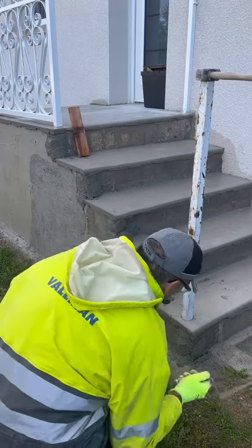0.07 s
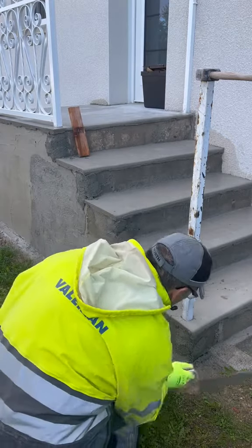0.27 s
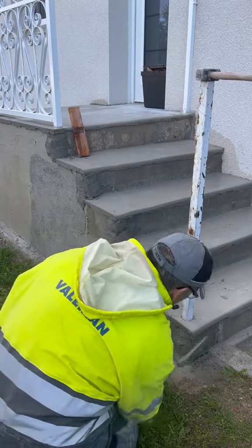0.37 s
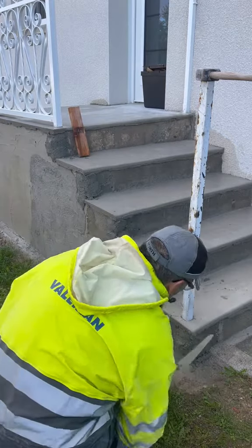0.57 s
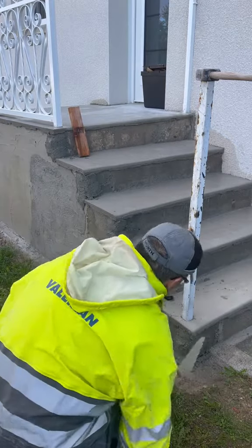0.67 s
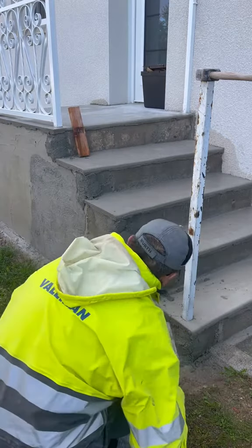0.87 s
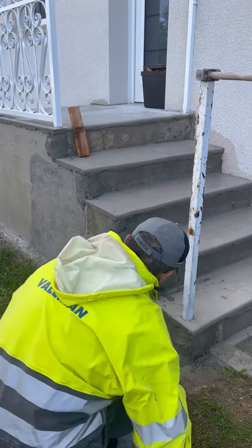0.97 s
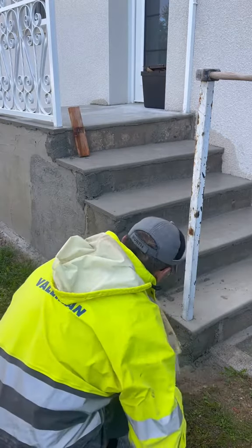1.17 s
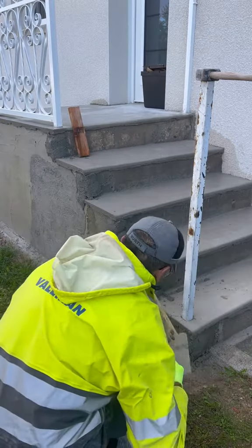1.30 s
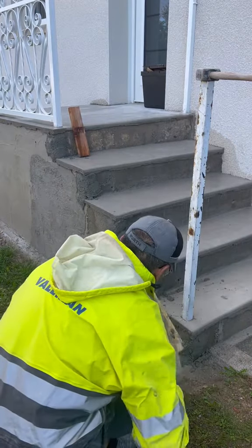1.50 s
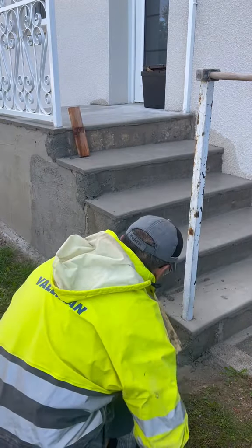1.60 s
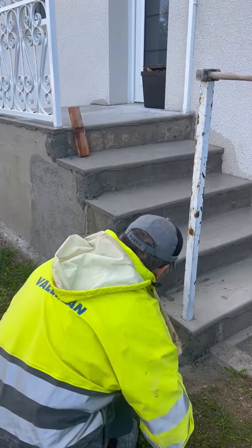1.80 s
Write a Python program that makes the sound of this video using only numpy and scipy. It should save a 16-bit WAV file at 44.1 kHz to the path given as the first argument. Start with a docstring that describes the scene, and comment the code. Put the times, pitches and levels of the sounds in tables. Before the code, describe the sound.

A trowel works wet mortar nearby: one sharp, sandy tap, a pause, then a thudding splat as the blade drags through the mass on concrete steps. A rain jacket swishes softly, and faint traffic hums far off outdoors.

```python
"""A worker in a stiff rain jacket throws wet mortar at concrete steps, outdoors, over far traffic.
The sleeve rustles and swishes; at 0.23 s the trowel hits once, crushing sand and ringing its steel.
A distant motor speeds up. From 1.29 s the load lands as a quick run of dull thuds and a wet splat;
it settles with a low rumble as the blade drags through it with a rush. A last tick, and all fades."""
import sys
import numpy as np
from scipy import signal
from scipy.fft import rfft, irfft
from scipy.io import wavfile

SR = 44100
rng = np.random.default_rng(int(sys.argv[2]) if len(sys.argv) > 2 else 0)


def pcm_store(signal):
    """Save signal as 16-bit PCM."""
    levels = np.round(np.clip(np.atleast_2d(signal), -1, 1) * 32767)
    wavfile.write(sys.argv[1], SR, levels.astype(np.int16).T)


N = 81585
T = np.arange(N) / SR

# noise spectra: f/Hz, relative density/dB
TRAFFIC_SPECTRUM = [(20, -19), (35, -6), (50, -0.5), (80, 4), (115, -4.5), (160, -13), (300, -16.5),
                    (600, -26.5), (950, -22), (2000, -32.5), (4000, -40), (6000, -50), (10000, -55)]
RUSTLE_SPECTRUM = [(100, -5), (250, -2), (430, 4), (650, -0.5), (1000, 0), (1600, -1.5), (2500, -5.5),
                   (4000, -13.5), (8000, -30)]
SWISH_SPECTRUM = [(1500, -12), (3000, -6.5), (4300, -1.5), (4900, -5), (5600, -1), (7700, -1.5), (8150, -5),
                  (8500, -6.5), (8950, -19), (9500, 1), (10200, -24.5)]
SLUMP_SPECTRUM = [(50, -9), (95, -8), (127, 6), (165, -3.5), (205, 5.5), (290, -2), (420, -19),
                  (800, -42.5)]
SLIP_SPECTRUM = [(100, -30), (250, -9), (340, -1.5), (440, 6), (580, -5.5), (720, 2), (950, -8.5),
                 (1100, -14.5), (1600, -39), (3000, -57)]
SAND_SPECTRUM = [(600, -27), (1200, 8), (1800, 2.5), (2150, 4), (2800, -1.5), (4800, -5), (6000, -3),
                 (8200, -3), (8950, -18), (9600, -2), (10200, -24)]
SPLAT_SPECTRUM = [(500, 0), (1400, 3), (2600, 3.5), (4500, -2.5), (6500, 2), (9000, 3), (10000, -12)]
SMACK_SPECTRUM = [(300, -15), (900, 8), (1150, -5.5), (1600, -2), (2100, -14), (3600, -21.5), (6000, -15),
                  (8500, -28), (10000, -25)]
KNOCK_SPECTRUM = [(60, -7), (135, -0.5), (190, -1.5), (245, -12.5), (350, 1.5), (520, 0.5), (650, 3),
                  (850, -1.5), (1050, -12.5), (2000, -23)]
CRUSH_SPECTRUM = [(400, -16.5), (1000, -9), (1650, 4), (2700, -2.5), (3700, -3.5), (4700, -8), (5700, 4.5),
                  (7100, 2.5), (7900, -9), (8700, -1.5), (9600, -3), (10100, -12.5)]

# far engines: t/s, f/Hz, level/dB
RISING_MOTOR = [(0.35, 135, -79), (.5, 158.9, -70), (.62, 175.9, -68), (.78, 187.9, -70.5),
                (1.0, 188.4, -75), (1.25, 185, -74), (1.85, 187.5, -79.5)]
TRAFFIC_DRONE = [(0, 60.3, -68.5), (.25, 53.5, -64.5), (.45, 47.6, -67), (.6, 40.5, -60.5),
                 (.75, 37.97, -92)]
IDLING_ENGINE = [(0, 72.4, -73.5), (.6, 79.77, -72), (1.0, 80, -66), (1.25, 72.1, -67.5), (1.7, 76, -74),
                 (1.85, 75.9, -76)]
# jacket cloth: t/s, rustle level/dB, swish level/dB
JACKET_LEVELS = [(0, -61.5, -66), (.11, -62, -61.5), (.135, -58, -65), (.175, -69, -68.5),
                 (.215, -66.5, -61), (.29, -65.5, -66.5), (.355, -61, -69.5), (.45, -70.5, -74.5),
                 (.585, -61.5, -68), (.67, -65.5, -74), (.75, -67.5, -83), (.86, -81, -92),
                 (.935, -78, -80.5), (1.0, -73, -90.5), (1.16, -89, -90), (1.85, -90.5, -99)]
# settling mass, dragging blade: t/s, level/dB
SLUMP_LEVELS = [(1.285, -85), (1.3, -48.5), (1.38, -50.5), (1.45, -53.5), (1.52, -50.5), (1.6, -58.5),
                (1.68, -62.5), (1.75, -63.5), (1.8, -80), (1.85, -88)]
DRAG_LEVELS = [(1.345, -52), (1.39, -53), (1.405, -44.5), (1.435, -40), (1.465, -47), (1.5, -48),
               (1.54, -50.5), (1.58, -56), (1.63, -59), (1.695, -59.5), (1.76, -68), (1.795, -75),
               (1.85, -89)]

# grit and light blade touches: t/s, drive level/dB, f/Hz, t60/s
GRIT_TICKS = [(0.015, -51.5, 1330, 0.012), (0.1238, -48.5, 1460, 0.0073), (0.127, -47.5, 600, 0.011),
              (0.395, -57, 871, 0.13), (0.762, -59, 880, 0.047), (0.9598, -44, 1175, 0.0084),
              (0.9605, -50, 1868, 0.0081), (1.09, -63, 3903, 0.0061), (1.687, -51, 713, 0.047),
              (1.823, -63.5, 1635, 0.019)]
# clods landing: t/s, thud level/dB, band centre f/Hz, smack level/dB
CLOD_LANDINGS = [(1.291, -31, 315, -48), (1.305, -37.5, 373, -55.5), (1.315, -34, 335, -53),
                 (1.3238, -42, 355, -63), (1.3327, -33.5, 333, -67), (1.3397, -35.5, 340, -60),
                 (1.349, -42, 281, -61), (1.3647, -38, 280, -76), (1.381, -37.5, 363, -69),
                 (1.3881, -41, 317, -80)]
# wet spatter, the hit's dull knock, its gritty contacts: t/s, level/dB, t60/s
SPLAT_BURSTS = [(1.3456, -42, 0.021), (1.351, -51.5, 0.043), (1.3554, -49.5, 0.034), (1.397, -48, 0.028)]
KNOCK_BURSTS = [(0.231, -42.5, 0.017), (0.2326, -37, 0.016), (0.239, -38.5, 0.049)]
CRUSH_BURSTS = [(0.2282, -35, 0.026), (0.2307, -25.5, 0.0083), (0.2337, -25.5, 0.0074), (0.234, -43.5, .04),
                (0.24, -37, 0.037), (0.244, -42, 0.011)]
# hollow loaded trowel on the step, mortar-damped steel blade: f/Hz, relative level/dB, t60/s
BODY_MODES = [(248, -41.5, .16), (306, -47.5, .14), (372, -45.5, .12), (428, -42.5, .12), (692, -40.5, .16),
              (940, -39, .16)]
BLADE_MODES = [(520, -45, 0.038), (850, -45.5, .04), (1238, -44.5, .06), (1658, -39, 0.03),
               (1880, -41.5, 0.021), (2250, -44, .05), (2412, -46.5, .05), (4075, -51.5, .06),
               (5580, -34.5, .04), (5720, -37.5, .04), (6200, -39, .04), (6745, -39.5, .04),
               (7170, -36.5, .045), (8441, -40, .06)]
# echoes off steps and house wall: delay t/s, relative level/dB
WALL_ECHOES = [(.0062, -18.5), (0.0133, -16.5), (0.024, -30)]

TRAFFIC_DB, FADE_START_S, FADE_DB_PER_S = -62.5, 1.68, 78
POP_S, POP_DB, POP_HZ, POP_T60_S = 1.3452, -40, 1480, .013
CLOD_BAND_RATIO, SMACK_LEAD_S, SMACK_T60_S = 1.49, 0.003, 0.069
SING_HZ, SING_DB, SING_T60_S, SING_END_S = 8441, -76.3, 3.1, 0.81
CUTOFF_HZ = 10100


def from_db(db):
    """Decibels to gain."""
    return 10 ** (np.asarray(db) / 20)


def unit_rms(x):
    """Scale to rms 1."""
    return x / np.sqrt(np.mean(x ** 2) + 1e-20)


def curves(rows):
    """Control table columns at every sample."""
    times_s, *columns = np.transpose(rows)
    return [np.interp(T, times_s, column) for column in columns]


def filtered(x, hz, kind="low"):
    """Butterworth filter, order 2."""
    return signal.sosfilt(signal.butter(2, hz, kind, fs=SR, output="sos"), x)


def coloured(x, spectrum):
    """Shape a white excitation; rms 1."""
    hz, db = np.transpose(spectrum)
    log_hz = np.log(np.maximum(np.arange(N // 2 + 1) * SR / N, 1))
    gain = from_db(np.interp(log_hz, np.log(hz), db))
    return unit_rms(irfft(rfft(x) * gain, N))


def grains(per_s, spread_db=0):
    """Random clicks, uneven in size by spread_db; rms 1."""
    sizes = from_db(spread_db * np.minimum(rng.exponential(1, N), 4))
    signs = rng.choice([-1, 1], N)
    return unit_rms(sizes * signs * (rng.random(N) < per_s / SR))


def flutter(rate_hz, depth_db):
    """Randomly wandering gain."""
    wander = filtered(rng.standard_normal(2 * N), rate_hz)[N:]
    return from_db(depth_db * unit_rms(wander))


def burst(start_s, db, t60_s, attack_s=.0004):
    """Contact envelope: fast rise, exponential fall."""
    age_s = np.maximum(T - start_s, 0)
    return from_db(db - 60 * age_s / t60_s) * (1 - np.exp(-age_s / attack_s))


def bursts(rows):
    """Summed contact envelopes."""
    return sum(burst(*row) for row in rows)


def click(at_s):
    """Unit impulse."""
    return np.maximum(1 - np.abs(T - at_s) * SR, 0) + 1e-18


def ring(x, hz, t60_s):
    """Resonator: a unit click gives a decaying sine of height 1."""
    radius = np.exp(-np.log(1000) / (t60_s * SR))
    angle = 2 * np.pi * hz / SR
    return signal.lfilter([0, np.sin(angle)], [1, -2 * radius * np.cos(angle), radius ** 2], x + 1e-18)


def traffic():
    """Far traffic rumble, sinking at the end."""
    level_db = TRAFFIC_DB - FADE_DB_PER_S * np.maximum(T - FADE_START_S, 0)
    return from_db(level_db) * coloured(rng.standard_normal(N), TRAFFIC_SPECTRUM)


def engine(rows):
    """Far engine: one slightly unsteady tone."""
    hz, db = curves(rows)
    tone = np.sqrt(2) * np.sin(2 * np.pi * np.cumsum(hz) / SR)
    return from_db(db) * tone * flutter(rate_hz=4.6, depth_db=2.5)


def jacket():
    """Stiff cloth crumples and slides over itself as the arm swings."""
    rustle_db, swish_db = curves(JACKET_LEVELS)
    rustle = coloured(grains(per_s=2500), RUSTLE_SPECTRUM) * flutter(rate_hz=40, depth_db=0.5)
    swish = coloured(grains(per_s=14000, spread_db=1), SWISH_SPECTRUM)
    return from_db(rustle_db) * rustle + from_db(swish_db) * swish


def ticks():
    """Grit drops, the blade touches lightly: soft taps, one short ring each."""
    out = 0
    for at_s, db, hz, t60_s in GRIT_TICKS:
        tap = filtered(click(at_s), [hz / 1.5, hz * 1.5], "band")
        out += from_db(db) * ring(tap, hz, t60_s)
    return out


def slump():
    """The heavy wet mass settles with a low rumble."""
    level_db, = curves(SLUMP_LEVELS)
    rumble = coloured(grains(per_s=1300, spread_db=3), SLUMP_SPECTRUM)
    return from_db(level_db) * rumble * (T > SLUMP_LEVELS[0][0])


def trowel_body(drive):
    """The loaded trowel rings hollow against the step."""
    return sum(from_db(db) * ring(drive, hz, t60_s) for hz, db, t60_s in BODY_MODES)


def drag():
    """The blade slips through mortar with a low rush; sand hisses, coarse grains crackle."""
    level_db, = curves(DRAG_LEVELS)
    contact = np.clip((T - DRAG_LEVELS[0][0]) / 0.011, 0, 1)
    slips = contact * from_db(level_db) * coloured(grains(per_s=900, spread_db=-1.5), SLIP_SPECTRUM)
    grit = grains(per_s=5000) + from_db(-11) * grains(per_s=230, spread_db=4)
    sand = coloured(grit, SAND_SPECTRUM) * flutter(rate_hz=51, depth_db=1)
    sand_db = -29 + 0.56 * level_db  # follows blade pressure less than the rush does
    return slips + contact * from_db(sand_db) * sand + from_db(-15.5) * trowel_body(slips)


def splat():
    """An air pocket pops; the wet mass bursts into fine spatter."""
    pop = from_db(POP_DB) * ring(click(POP_S), POP_HZ, POP_T60_S)
    spatter = coloured(grains(per_s=7700, spread_db=2.5), SPLAT_SPECTRUM) * bursts(SPLAT_BURSTS)
    return pop + spatter


def clods():
    """Each soft clod lands with a short thud and a faint smack; the thuds ring the trowel."""
    thuds, smack_envelope = 0, 0
    for at_s, thud_db, hz, smack_db in CLOD_LANDINGS:
        thud = filtered(click(at_s), [hz / CLOD_BAND_RATIO, hz * CLOD_BAND_RATIO], "band")
        thud = filtered(thud, hz=620, kind="low")
        thud = filtered(thud, hz=110, kind="high")
        thuds += from_db(thud_db) * thud / np.abs(thud).max()
        smack_envelope += burst(at_s - SMACK_LEAD_S, smack_db, SMACK_T60_S)
    smacks = smack_envelope * coloured(grains(per_s=6000, spread_db=3.5), SMACK_SPECTRUM)
    return thuds + from_db(-5) * trowel_body(thuds) + smacks


def trowel_hit():
    """Quick contacts crush sand over a dull knock; the hardest rings the steel."""
    crush = coloured(grains(per_s=16000, spread_db=1.5), CRUSH_SPECTRUM) * bursts(CRUSH_BURSTS)
    knock = coloured(grains(per_s=8000, spread_db=-0.5), KNOCK_SPECTRUM) * bursts(KNOCK_BURSTS)
    hardest_s = max(CRUSH_BURSTS, key=lambda row: row[1])[0]
    steel = sum(burst(hardest_s, db, t60_s) * np.sin(2 * np.pi * (hz * T + rng.random()))
                for hz, db, t60_s in BLADE_MODES)
    # one faint mode sings on until mortar damps it
    sing = burst(hardest_s, SING_DB, SING_T60_S) * np.sin(2 * np.pi * SING_HZ * T)
    damping = np.clip((SING_END_S - T) / .1, 0, 1)
    return crush + knock + steel + sing * damping


def scene():
    """Background, jacket, and the work with its short echoes; mono."""
    background = traffic() + engine(RISING_MOTOR) + engine(TRAFFIC_DRONE) + engine(IDLING_ENGINE)
    work = ticks() + slump() + drag() + splat() + clods() + trowel_hit()
    echoes = sum(from_db(db) * np.interp(T - delay_s, T, work) for delay_s, db in WALL_ECHOES)
    return (background + jacket() + work + echoes)[None]


def record(dry):
    """Steep low-pass."""
    return signal.sosfilt(signal.ellip(8, .3, 70, CUTOFF_HZ, fs=SR, output="sos"), dry)


dry = scene()
out = record(dry)
pcm_store(out)
```